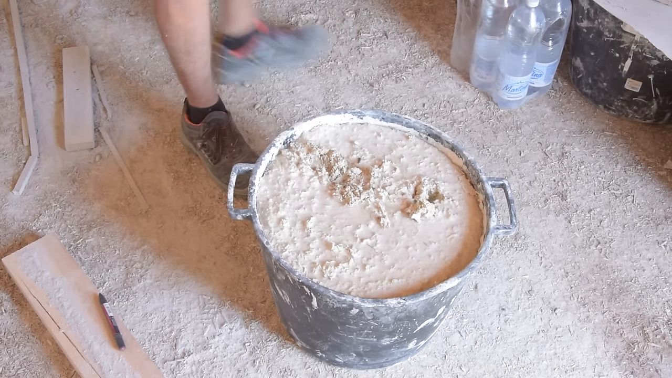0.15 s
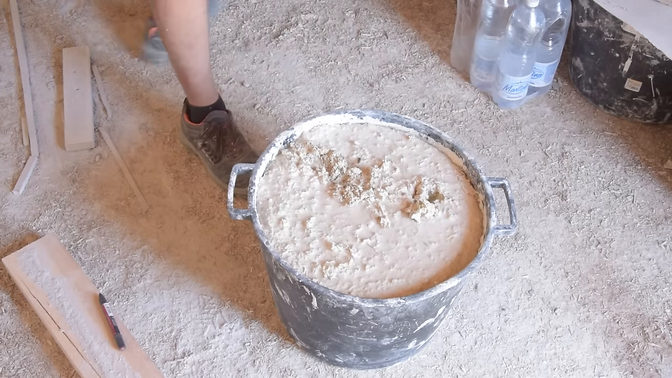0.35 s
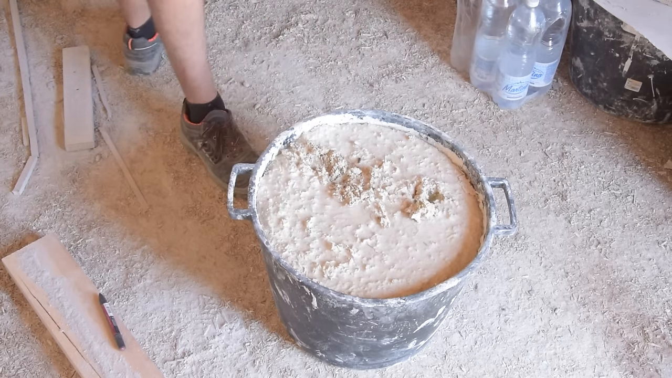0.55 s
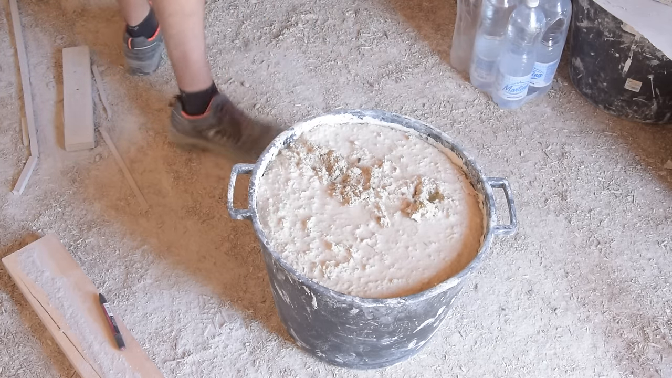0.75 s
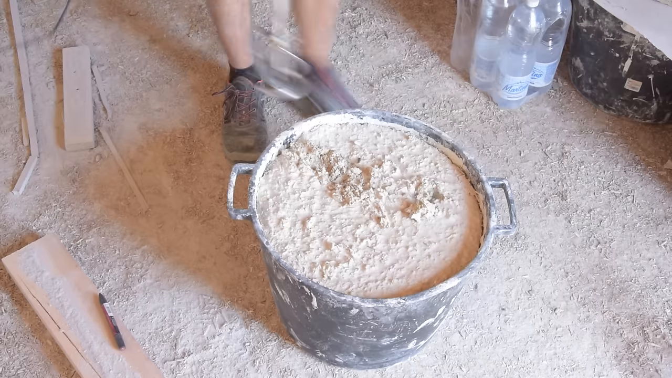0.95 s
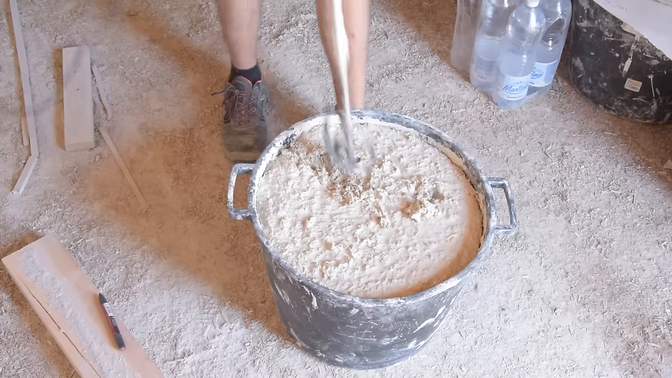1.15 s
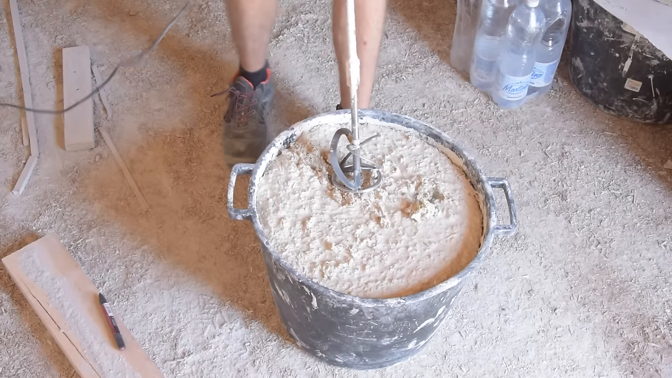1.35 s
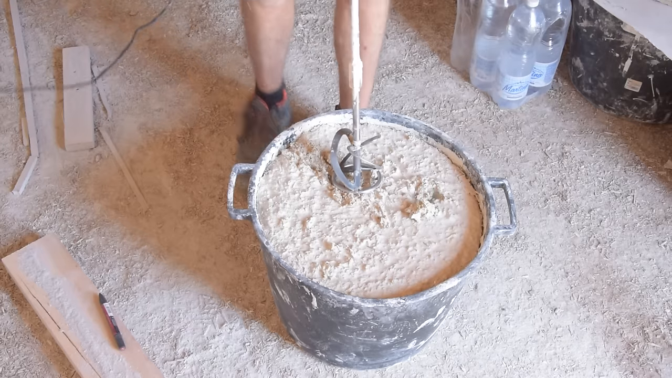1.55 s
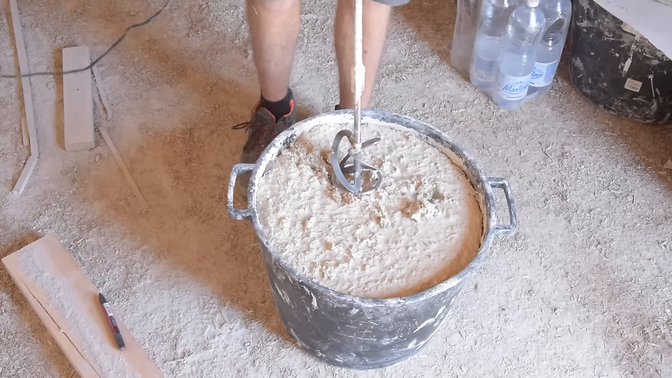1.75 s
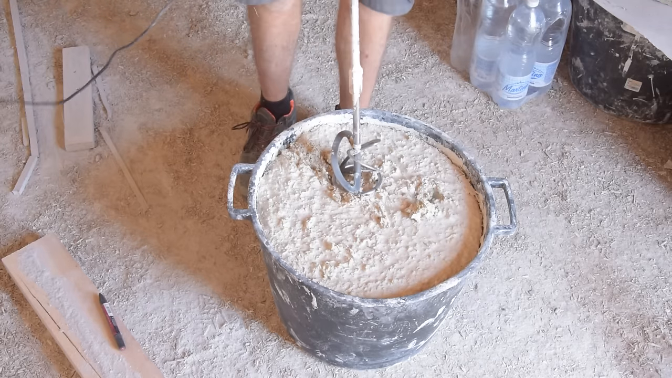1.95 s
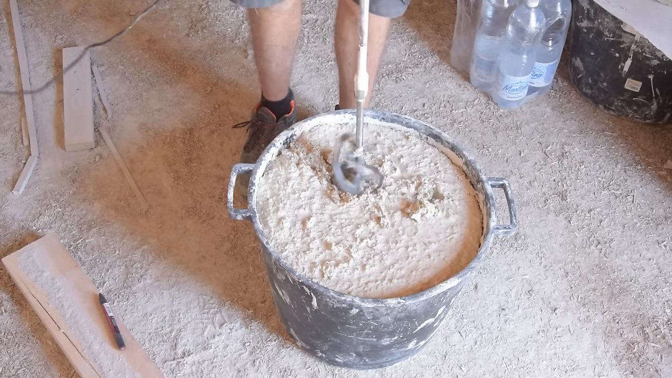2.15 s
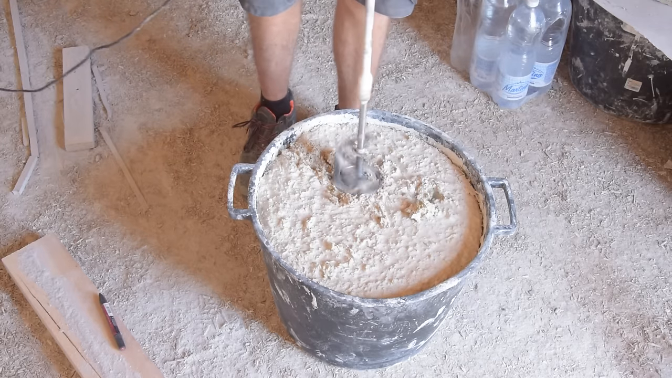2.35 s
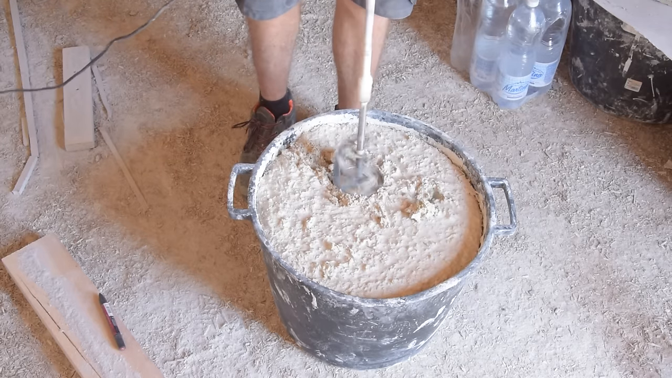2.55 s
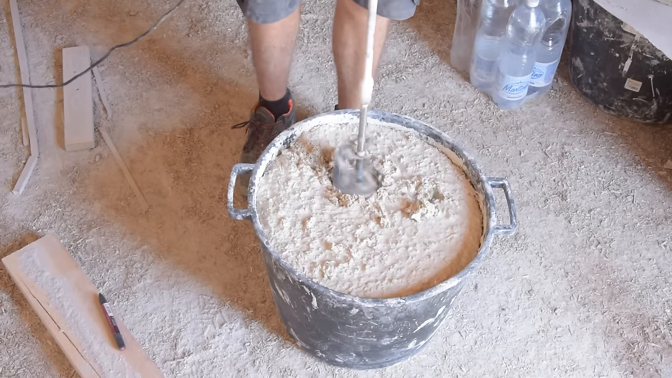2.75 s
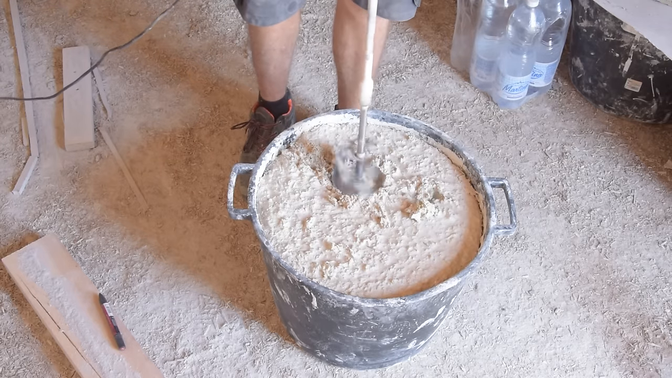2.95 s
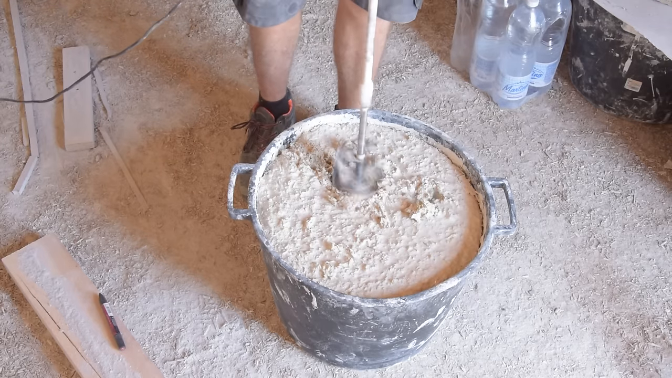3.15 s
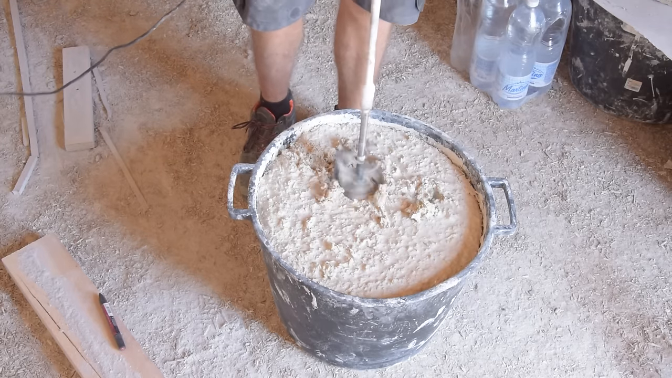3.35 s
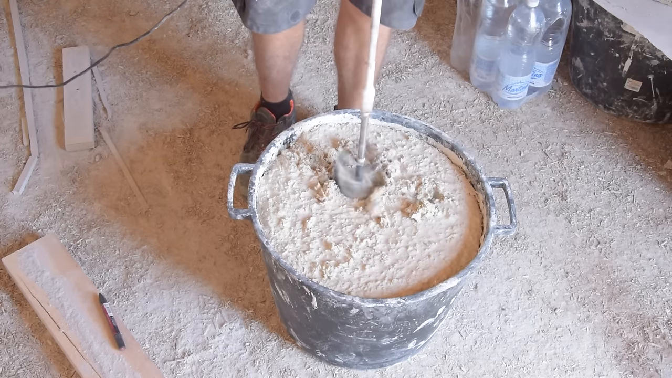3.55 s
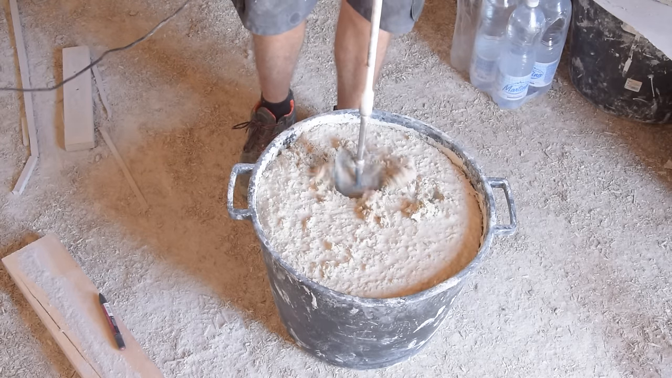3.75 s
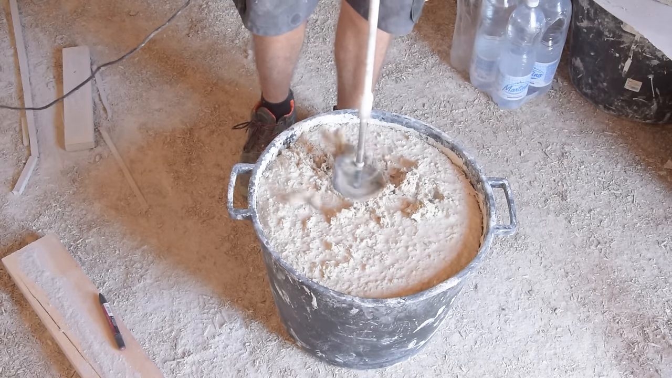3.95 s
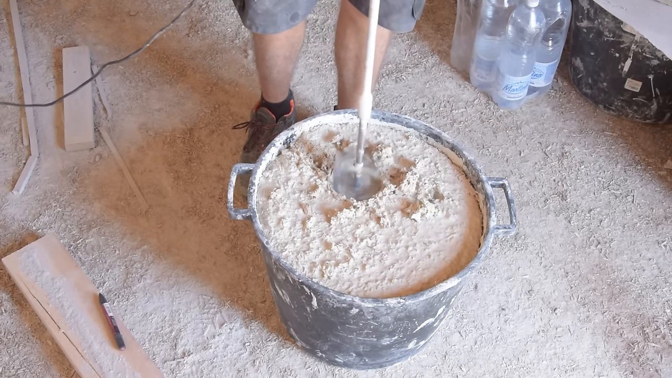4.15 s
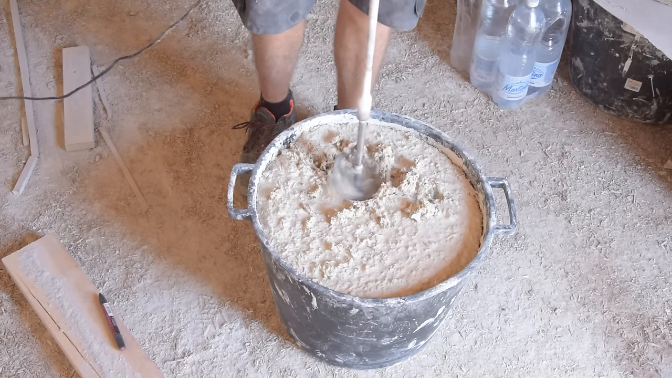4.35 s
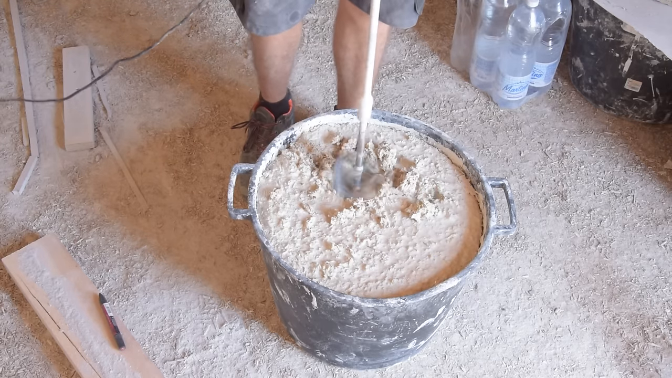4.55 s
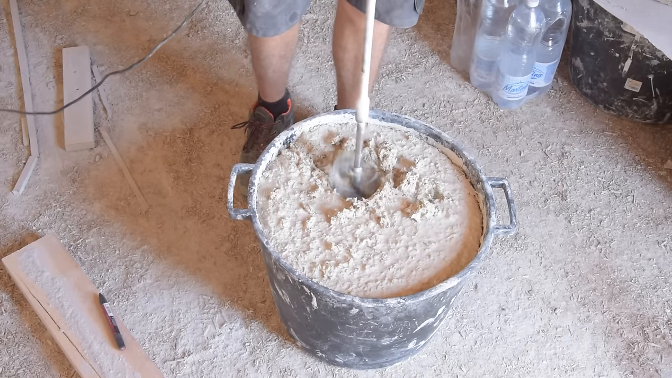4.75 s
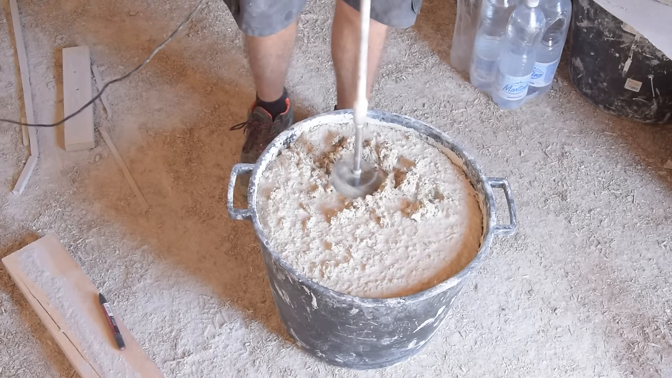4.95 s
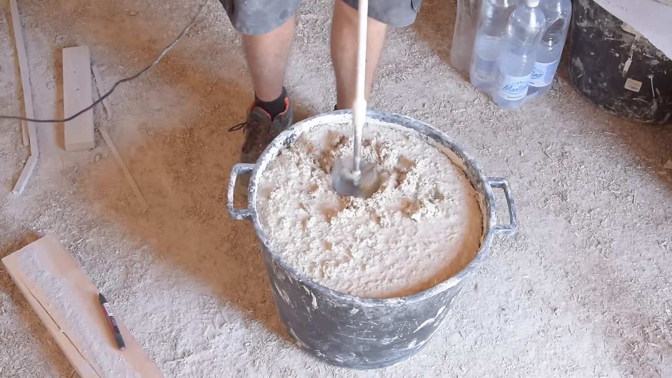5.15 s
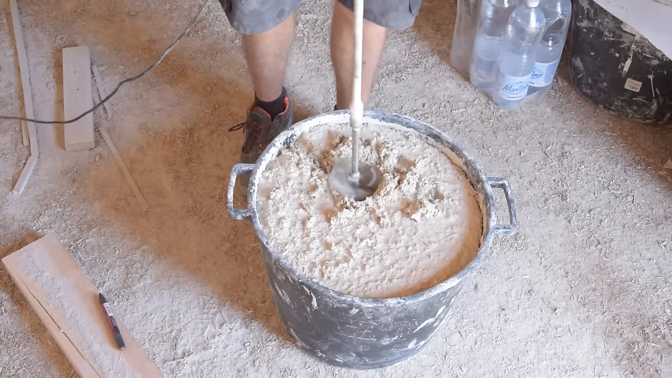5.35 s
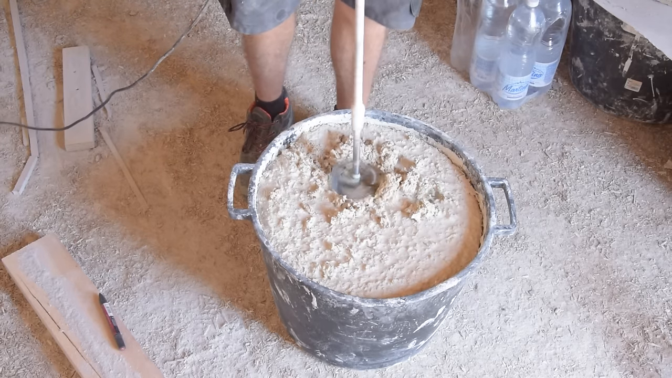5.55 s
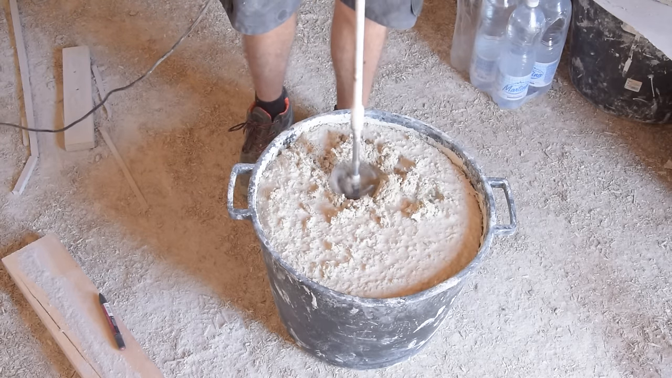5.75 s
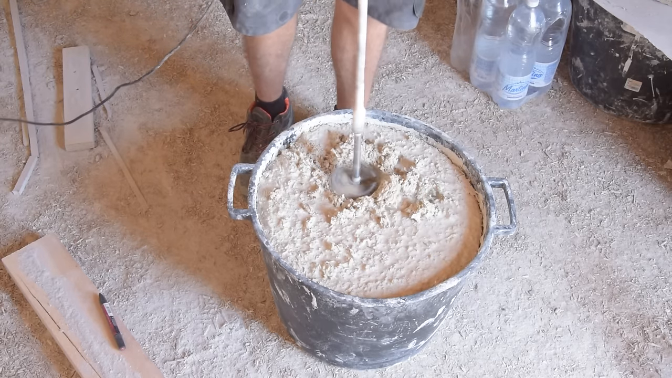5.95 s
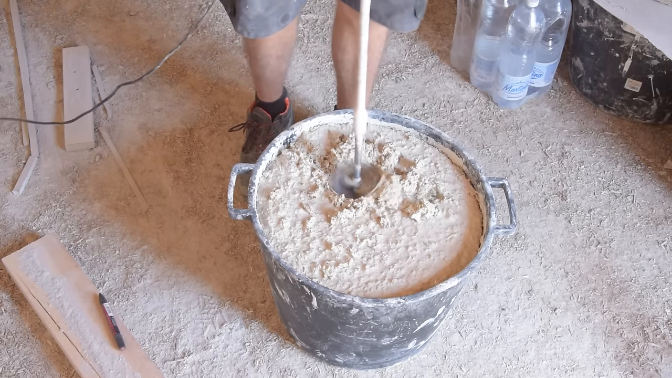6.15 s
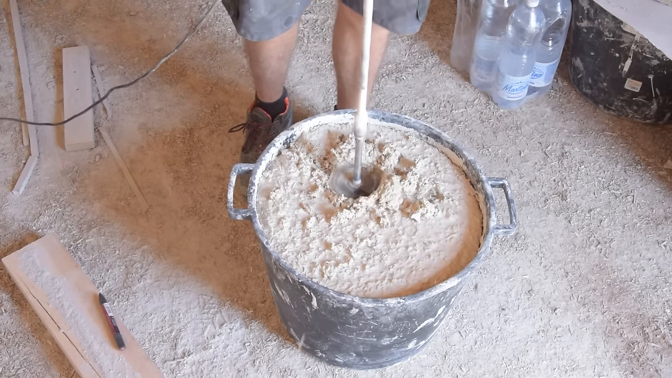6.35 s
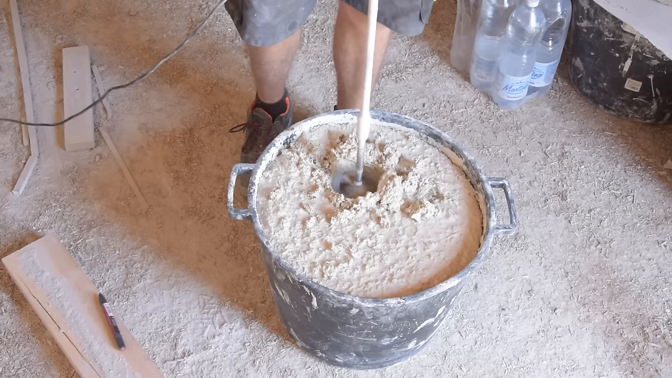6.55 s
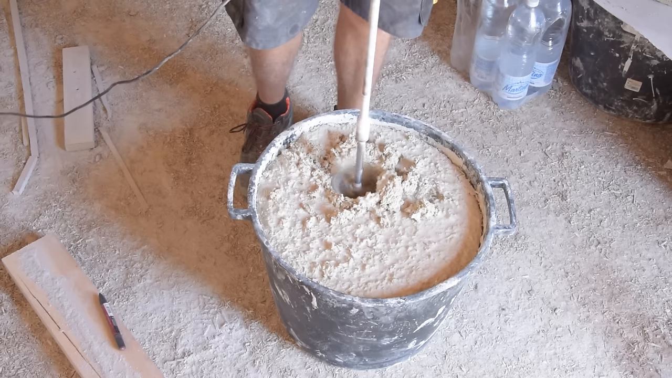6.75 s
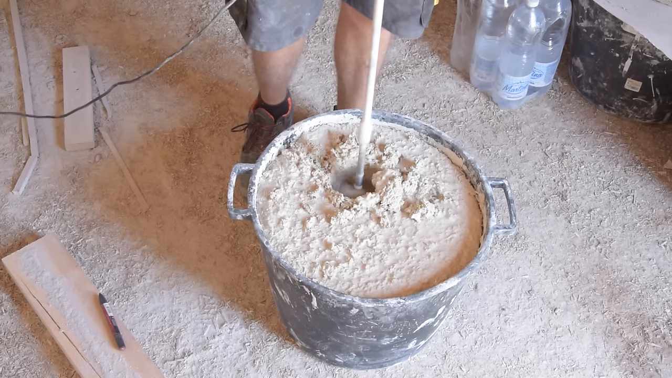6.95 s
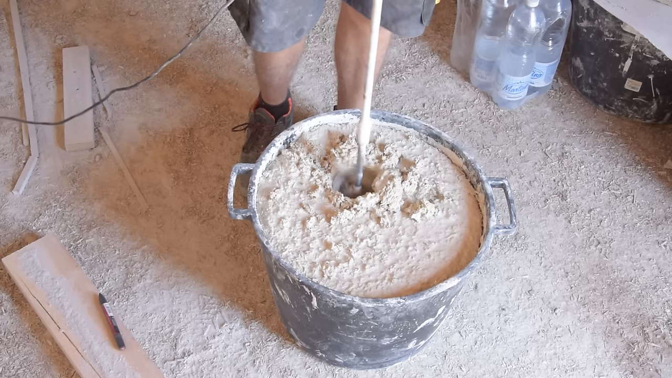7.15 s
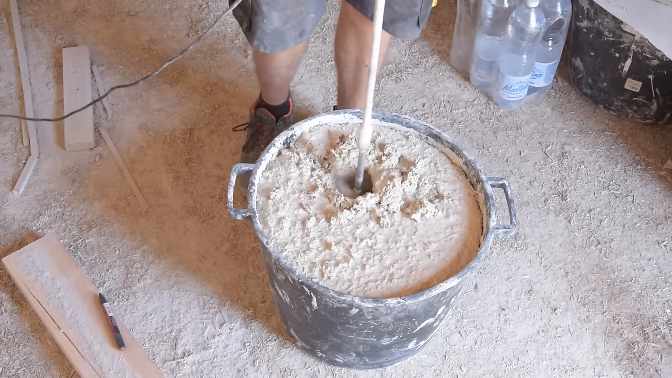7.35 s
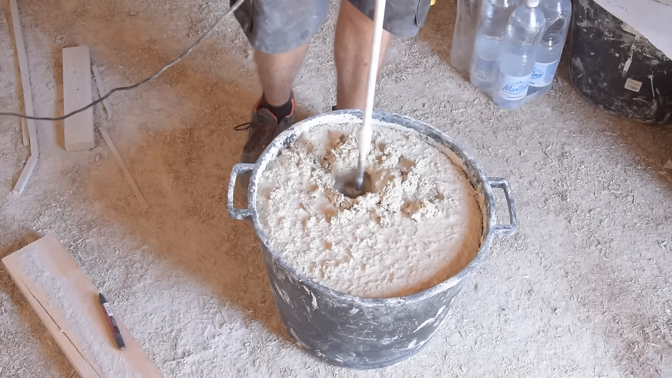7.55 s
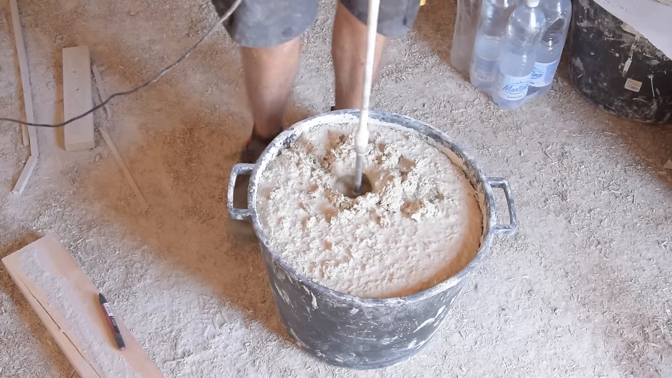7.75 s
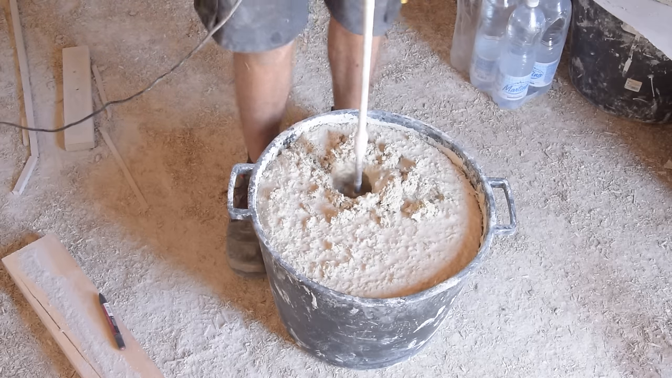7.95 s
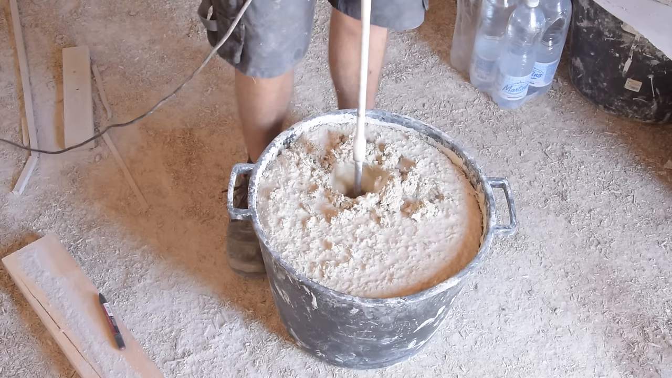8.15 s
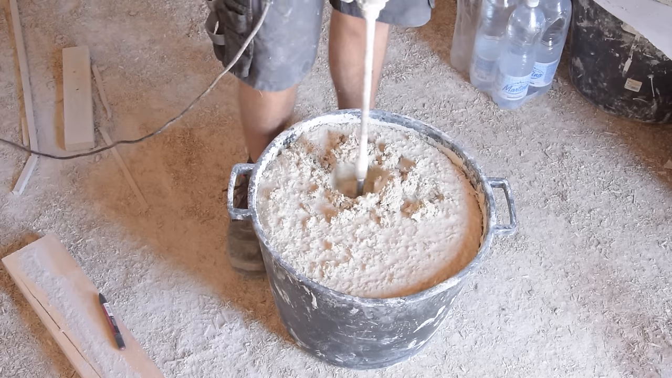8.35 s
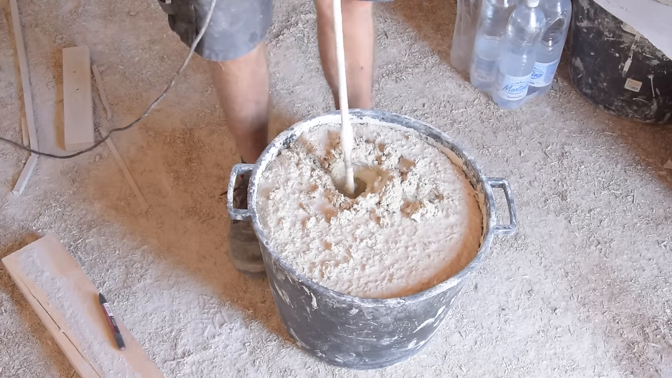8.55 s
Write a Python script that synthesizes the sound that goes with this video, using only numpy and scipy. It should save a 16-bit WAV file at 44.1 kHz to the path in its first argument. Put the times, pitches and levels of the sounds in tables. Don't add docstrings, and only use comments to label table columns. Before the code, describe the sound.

Gritty footsteps in a bare room, then a mixing drill starts low, surges to a steady singing whine, and abruptly cuts to faint high hiss.

```python
import sys
import numpy as np
from scipy import signal
from scipy.fft import rfft, irfft, next_fast_len
from scipy.io import wavfile
from scipy.ndimage import uniform_filter1d, map_coordinates

SR = 44100
rng = np.random.default_rng(int(sys.argv[2]) if len(sys.argv) > 2 else 0)


def ratio(d):
    e = np.asarray(d, float) / 20
    return 10 ** e


def to_wav(sig):
    pcm = np.clip(np.atleast_2d(sig), -1, 1) * 32767
    pcm = np.round(pcm).astype(np.int16)
    wavfile.write(sys.argv[1], SR, pcm.T)


N = 379260
T = np.arange(N) / SR
SLOW_T = T[::64]

CUTS_S = (.9318, 8.1317)

# (frequency [Hz], level [dB])
FLOOR_SPECTRUM = [(59, -46.5), (100, 1), (310, -19), (524, -20), (904, -6), (1020, -7), (3320, -11),
                  (3680, -14), (15000, -20.5)]
FLOOR_DB = -93
# (frequency [Hz], side under mid [dB])
SIDE_SPECTRUM = [(60, -22), (150, -36), (380, -21), (950, -21.5), (2380, -13), (5980, -6.5), (15000, -4)]
# (frequency [Hz], left over right [dB])
BALANCE = [(60, 0.0), (180, 0.0), (550, -0.34), (1650, -0.68), (4970, -1.0), (15000, 0.96)]

# (time [s], whine [Hz], level [dB])
FAST_WHINE = [
    (8.14, 8000, -91),
    (8.146, 7718, -96),
    (8.218, 7320, -79),
    (8.318, 7210, -81),
    (8.36, 6764, -83.5),
    (8.452, 7050, -80),
    (8.546, 6957, -80.5),
    (8.576, 8260, -78),
    (8.6, 8420, -72),
]
# (frequency [Hz], level [dB])
FAST_PARTIALS = [(11600, -85), (12550, -84)]
# (frequency [Hz], level [dB])
FAST_AIR_SPECTRUM = [(1760, -64), (3000, -36), (4800, -27), (5590, -24), (6080, -12), (6600, -16),
                     (6840, -15), (7850, -17), (9400, -5), (12200, -3), (13400, -1.5), (14500, 3),
                     (15700, -6)]
FAST_AIR_DB, FAST_UPPER_DB = -67.5, -77

# (time [s], peak [dB], pitch [Hz], t60 [s], crack share [1])
KNOCKS = [(0.179, -46, 525, 0.069, 0.32), (0.248, -48, 877, 0.07, 0.33), (0.84, -36, 1710, 0.12, 0.27),
          (0.861, -47, 704, 0.049, 0.5), (0.917, -40, 1370, 0.029, 0.5), (1.064, -53, 3600, 0.071, 1),
          (1.27, -51, 2380, 0.044, 0.9), (1.348, -55, 1650, 0.07, 0.45), (1.626, -49, 1340, 0.07, 0.32),
          (1.644, -45, 1850, 0.046, 0.32), (1.917, -53, 487, 0.16, 0.33), (1.949, -58, 516, 0.07, 0.5),
          (1.994, -59, 1860, 0.052, 0.55), (2.049, -40, 2450, 0.077, 0.5)]
# (peak time [s], scrape [dB], last 20 dB of rise [s], fall [dB/s], thud over scrape [dB])
SCUFFS = [(0.005, -54, .01, 300, -6), (.078, -67, .03, 150, -14), (.187, -68, .012, 150, 9),
          (.256, -58, .012, 40, -1), (.32, -53, .2, 75, -7), (.503, -61, .12, 110, -9),
          (.655, -62, .02, 100, 1), (.75, -52, .17, 45, -3), (.845, -50.5, .03, 45, -5),
          (.96, -82, .02, 22, -12), (1.07, -57.5, .008, 150, 0), (1.275, -66.5, .055, 300, -15),
          (1.352, -67.5, .012, 170, -12), (1.512, -75, .013, 230, -15), (1.63, -61.5, .025, 165, -11),
          (1.922, -72, .008, 400, -4)]
# (frequency [Hz], level [dB])
SCUFF_SPECTRUM = [(59, -54), (100, -24), (219, 1), (425, -0.5), (523, 5), (1560, 2.5), (3160, -10.5),
                  (7850, -24), (12400, -37), (14000, -65)]
GRIT_DB, GRIT_GROWTH, GRIT_TILT = -10, 0.85, 0.15
NEAR_GRIT_DB = 3.5
SQUEAK_S, SQUEAK_HZ, SQUEAK_DB, SQUEAK_RISE_DB_S = 1.028, 1480, -78, 380

# (frequency [Hz], level [dB])
AIR_SPECTRUM = [(100, -55), (230, -42), (330, -32), (600, -18), (900, -18.5), (1250, -15), (2300, -13),
                (3000, -18.5), (4300, -17), (5500, -24.5), (6400, -28.5), (7800, -24), (9500, -34.5),
                (13000, -46), (15700, -55.5)]
# (output mesh rate [Hz], gear tones [dB], fan noise [dB], fan brightness [dB])
GROWTH_BY_SPEED = [(30.3, -77, -79, -9), (103, -56, -58.5, -1), (139, -56, -51, -4.5),
                   (204.4, -34.5, -42, -9.5), (241, -19.5, -42, -8), (335, -4.5, -38.5, -7),
                   (382.2, -1.5, -37.5, -5.5), (390.5, -3.5, -34.5, -7.5)]
# (time [s], output mesh rate [Hz])
TRIGGER_SPEED = [(1.92, 0), (1.93, 170), (2.14, 188), (2.3, 226), (2.52, 245), (2.72, 240), (3.25, 228.5),
                 (3.572, 241), (3.582, 378.5), (4.7, 378.3), (4.9, 383), (5.15, 377.5), (5.85, 376.5),
                 (6.3, 372), (6.8, 362.5), (7.15, 366.5), (7.52, 368.5), (7.9, 392.5)]
INERTIA_S = .135
HUNT = .0008

FULL_MESH_HZ, TEETH, SPINDLE_TEETH = 375, 7, 46
PADDLE_PEAK_S = 5.83
# (frequency [Hz], level [dB])
HOUSING_SPECTRUM = [(210, -22.5), (350, -11.5), (900, -15.5), (1240, 7.5), (1450, -3), (1800, 10),
                    (2300, 8), (2640, 4), (2800, -0.5), (3150, -10.5), (4200, -10.5), (5400, -22),
                    (7500, -27.5), (12000, -25.5)]
# (frequency [Hz], width [Hz], level [dB])
POT_RINGS = [(781, 24, 22), (1091, 9, -20), (1108, 8, 6), (1143, 18, 11), (1250, 110, 4), (1480, 26, -4),
             (1526, 24, 3), (2200, 50, -6), (2548, 14, -6), (2585, 40, 6), (2700, 70, -7), (5360, 40, 5),
             (10720, 240, 9), (10990, 60, -6)]
MESH_PARTIALS_DB = [-70, -59.5, -43.5, -37, -37.5, -33.5, -38, -48, -56, -46.5, -47.5, -50, -51, -55.5,
                    -57.5, -59, -63.5, -73.5, -63, -57, -60]
SHAFT_ORDERS = [6.8, 9.1, 13.6, 24, 33, 34, 40, 41, 48, 62, 68, 69, 101, 102, 103, 136, 203, 204, 205]
SHAFT_ORDERS_DB = [-58.5, -63.5, -49, -50.5, -51, -34.5, -63.5, -53, -51.5, -50, -46, -52, -58, -50, -59,
                   -73, -76.5, -59, -73.5]
LEAD_ORDERS = (14, 21, 28, 34, 35, 42, 49, 102, 203, 204, 205)
LEAD_SHARES = [.9, 2.1, .75, .85, .85, 1.05, .85, .55, .75, .75, .75]
LEAD_CAP_DB = 9
LEAD_WANDER_DB, WANDER_DB = 1.2, 1.6
FLUTTER_DB, CHOP_DB = 2.1, 3.
SLIP_DB, STUTTER_DB = -.014, .001
RATTLE = .0016
PART_DB, PART_SLACK = -8, .5


def evened(x):
    return x / np.sqrt(np.mean(x ** 2) + 1e-20)


def read(points, hz):
    f, value = np.transpose(points)
    return np.interp(np.log(hz + 1), np.log(f + 1), value)


def columns(rows, t):
    s, *rest = np.transpose(rows)
    return [np.interp(t, s, c) for c in rest]


def colour(x, points):
    size = next_fast_len(N)
    gain = ratio(read(points, np.fft.rfftfreq(size, 1 / SR)))
    return irfft(rfft(x, size) * gain, size)[:N]


def split(x, hz, kind):
    return signal.sosfiltfilt(signal.butter(2, hz, kind, fs=SR, output="sos"), x)


def fine(slow):
    return np.interp(T, SLOW_T, slow)


def drift(per_s):
    return evened(map_coordinates(rng.standard_normal(700), [SLOW_T * per_s + 2], order=3))


def during(t0, t1):
    return (T >= t0) & (T < t1)


def tone(hz, db):
    phase = 2 * np.pi * np.cumsum(hz * np.ones(N)) / SR
    return np.sqrt(2) * ratio(db + fine(1.5 * drift(37.0))) * np.sin(phase)


def room(x, t60_s):
    size = SR // 2
    taps, slots = np.zeros(size), np.arange(200, size - 20, 20)
    taps[slots + rng.integers(0, 20, len(slots))] = rng.choice([-1., 1.], len(slots))
    taps *= ratio(-60 * T[:size] / t60_s)
    return signal.oaconvolve(x, taps / np.linalg.norm(taps))[:N]


def floor_noise():
    return ratio(FLOOR_DB) * evened(colour(rng.standard_normal(N), FLOOR_SPECTRUM))


def fast_drill():
    hz, db = columns(FAST_WHINE, T)
    hiss = ratio(FAST_AIR_DB - 0.5) * evened(colour(rng.standard_normal(N), FAST_AIR_SPECTRUM))
    partials = sum(tone(f + fine(40. * drift(30.)), level_db) for f, level_db in FAST_PARTIALS)
    return tone(hz, db) + tone(2.07 * hz, FAST_UPPER_DB) + partials + hiss


def knocks():
    size = 4000
    out, t = np.zeros(N), T[:size]
    for s, db, hz, t60_s, crack_share in KNOCKS:
        crack = uniform_filter1d(rng.standard_normal(size), size=3) * ratio(-60 * t / .03)
        ring = np.sin(2 * np.pi * hz * t) + crack_share * crack
        at = round(s * SR)
        out[at:at + size] += ratio(db - 9.5 - 60 * t / max(t60_s, .005)) * ring
    return out


def squeak():
    db = SQUEAK_DB - SQUEAK_RISE_DB_S * np.maximum(SQUEAK_S - T, 0)
    return tone(SQUEAK_HZ, db) * during(1.0, 1.06)


def scuffs(grains_per_s=700, spread_db=3.5, tail_s=0.11):
    s, peak_db, rise_s, fall_db_s, thud_db = np.transpose(SCUFFS)[:, :, None]
    rise_db = 20 * (s - SLOW_T) / abs(rise_s)
    each_db = peak_db - np.maximum(rise_db, fall_db_s * (SLOW_T - s))
    uncut = (s < CUTS_S[0]) == (SLOW_T < CUTS_S[0])

    def swell(db):
        return fine(np.sqrt(np.sum(uncut * ratio(2 * db), axis=0)))

    grains = ratio(2 * spread_db * np.minimum(rng.exponential(1, N), 3))
    grains *= rng.random(N) < grains_per_s / SR
    puffs = np.sqrt(abs(signal.oaconvolve(grains, ratio(-120 * T[:6000] / tail_s))[:N]))
    crunch = colour(puffs * rng.standard_normal(N), SCUFF_SPECTRUM)
    thud = split(crunch, 530, "lowpass")
    fizz = split(crunch, 2420, "highpass")
    scrape = crunch - thud - fizz
    grit_db = each_db + GRIT_DB + (GRIT_GROWTH - 1) * (peak_db + 46) - GRIT_TILT * thud_db
    grit_db = grit_db + NEAR_GRIT_DB * (s > CUTS_S[0])
    out = swell(each_db) * evened(scrape)
    out += swell(each_db + thud_db) * evened(thud)
    out += swell(grit_db) * evened(fizz)
    return ratio(-3.5) * out


def air(mesh_hz, turns, tooth_beat=0.17, shaft_beat=0.1, gust_db=-0.36):
    level_db, bright_db = columns(GROWTH_BY_SPEED, fine(mesh_hz))[1:]
    beat = 1 + tooth_beat * np.cos(2 * np.pi * TEETH * turns) + shaft_beat * np.cos(2 * np.pi * turns)
    noise = colour(beat * rng.standard_normal(N), AIR_SPECTRUM)
    band = signal.butter(4, [2800, 6500], "bandpass", fs=SR, output="sos")
    noise /= np.std(signal.sosfilt(band, noise))
    high = split(noise, 6500, "highpass")
    lifted = noise - high + high * ratio(bright_db + 8.5 + fine(gust_db * drift(8.)))
    return ratio(level_db - 2.5 + fine(gust_db * drift(6.))) * lifted * during(1.95, 9)


def rotor_speed():
    keep = np.exp(-SLOW_T[1] / INERTIA_S)
    called_hz = columns(TRIGGER_SPEED, SLOW_T)[0]
    lagged_hz = signal.lfilter([1 - keep], [1, -keep], called_hz)
    return np.maximum(lagged_hz, 1) * (1 + HUNT * drift(9.))


def rings_db(hz):
    return sum(db / (1 + (2 * (hz - f) / width) ** 2) for f, width, db in POT_RINGS)


def housing_shift_db(order, mesh_hz):
    full = read(HOUSING_SPECTRUM, order * FULL_MESH_HZ / TEETH)
    return read(HOUSING_SPECTRUM, order * mesh_hz / TEETH) - full


def gears(mesh_hz, turns, slack_rad=0.18):
    output_db = columns(GROWTH_BY_SPEED, mesh_hz)[0]
    push = abs(uniform_filter1d(np.gradient(mesh_hz, SLOW_T), size=40))
    since = turns[::64] - turns[round(PADDLE_PEAK_S * SR)]
    paddle = np.cos(2 * np.pi * since * TEETH / SPINDLE_TEETH)
    part = np.clip(1 - mesh_hz / FULL_MESH_HZ, 0, 1)
    rough_db = FLUTTER_DB + CHOP_DB * part + STUTTER_DB * push
    common_db = output_db - housing_shift_db(32.2, mesh_hz) + SLIP_DB * push + PART_DB * part
    growth = dict(zip(LEAD_ORDERS, LEAD_SHARES))
    partials = [(TEETH * (i + 1), db) for i, db in enumerate(MESH_PARTIALS_DB)]
    partials += list(zip(SHAFT_ORDERS, SHAFT_ORDERS_DB))
    out = np.zeros(N)
    for order, db in partials:
        wander = drift(2.992)
        if order in growth:
            level_db = np.minimum(growth[order] * output_db, output_db + LEAD_CAP_DB)
            level_db = level_db + LEAD_WANDER_DB * wander + rings_db(order * mesh_hz / TEETH)
        else:
            level_db = common_db + housing_shift_db(order, mesh_hz) + WANDER_DB * wander
        size = ratio(db + level_db + rough_db * drift(30.))
        if order == 21:
            size = size + ratio(output_db - 44.5) * paddle
        play = (slack_rad + PART_SLACK * part) * drift(25.) + RATTLE * push * drift(50.)
        phase = 2 * np.pi * (order * turns + rng.random()) + fine(np.sqrt(order / TEETH) * play)
        out += np.sqrt(2) * fine(size) * np.sin(phase)
    return out * during(1.97, 9)


def scene():
    mesh_hz = rotor_speed()
    turns = np.cumsum(fine(mesh_hz)) / SR / TEETH
    drill = split(gears(mesh_hz, turns) + air(mesh_hz, turns), 180, "highpass")
    near = drill + scuffs() + knocks() + floor_noise() + squeak()
    spans = [during(0, CUTS_S[0]), during(*CUTS_S)]
    mid = sum(span * (near + ratio(-10.0) * room(near * span, 0.37)) for span in spans)
    side = ratio(-2.0) * sum(span * colour(room(near * span, .25), SIDE_SPECTRUM) for span in spans)
    cut = round(CUTS_S[1] * SR)
    mid[cut - 16:cut] += ratio(-22.5) * np.hanning(16)
    after = during(CUTS_S[1], 9)
    fast = fast_drill()
    mid = mid + after * fast
    side = side + after * ratio(-16.0) * room(fast, 0.091)
    return np.array([colour(mid, [(f, way * db / 2) for f, db in BALANCE]) + way * side
                     for way in (1, -1)])


def top_cut(x):
    return signal.sosfilt(signal.butter(12, 15840, fs=SR, output="sos"), x)


def record(dry):
    squeezed = dry - 0.44 * np.maximum(dry - .11, 0)
    return top_cut(squeezed)


dry = scene()
out = record(dry)
to_wav(out)
```